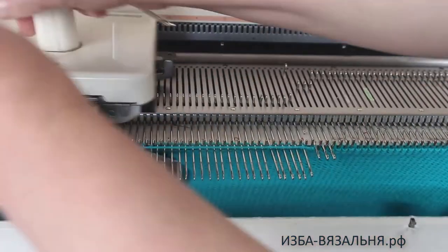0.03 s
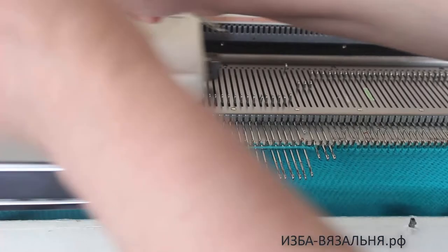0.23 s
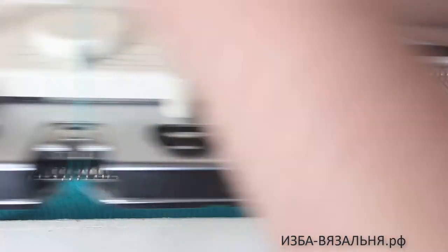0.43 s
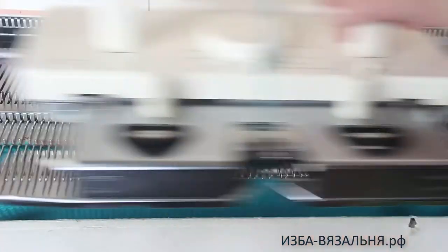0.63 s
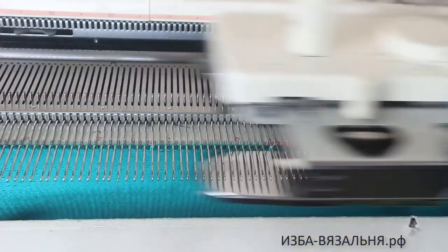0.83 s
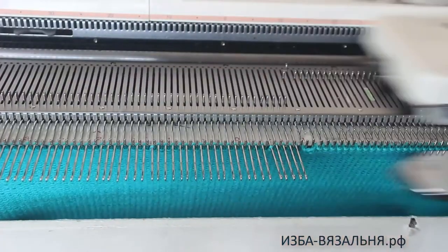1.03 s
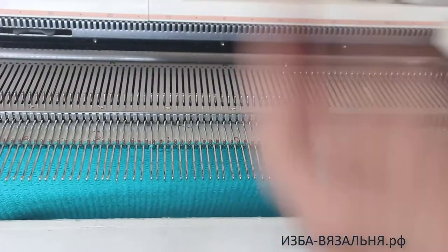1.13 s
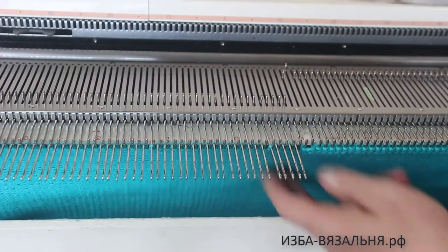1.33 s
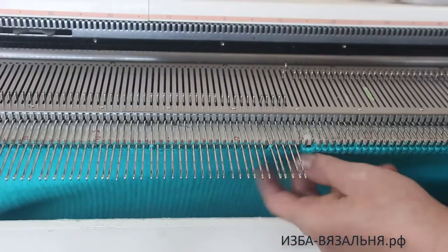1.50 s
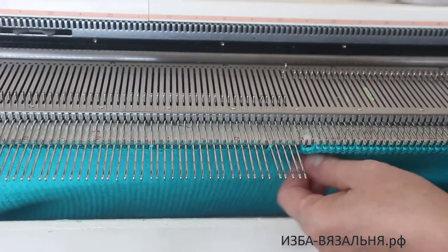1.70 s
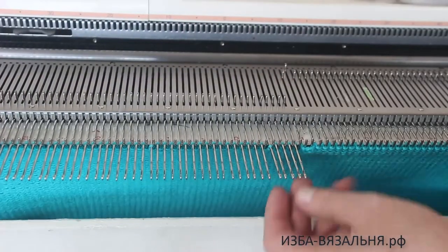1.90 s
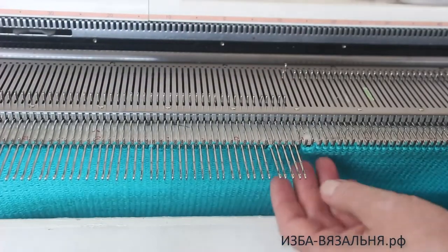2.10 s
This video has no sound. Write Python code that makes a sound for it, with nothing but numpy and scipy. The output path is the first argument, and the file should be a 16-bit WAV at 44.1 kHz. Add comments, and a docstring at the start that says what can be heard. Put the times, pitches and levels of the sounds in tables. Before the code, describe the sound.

A knitting machine carriage slides once along its steel needle bed. Light ticks at 0 to 0.2 s thicken into a bright ratcheting hiss over a low drone, with sharp clacks near 0.45, 0.75 and 1.05 s, loudest around 0.7 s. By 1.2 s it coasts away with a brief resonant rub. Faint hand rustling and soft thuds come near 1.5 s, then quiet room. Close, short reverberation.

```python
"""A knitting machine carriage is pushed once along its steel needle bed in a small room.
Its cams strike needle after needle: single ticks thicken into a hiss of impulse bursts coloured by steel.
The needle rate drives drone, boom and singing overtones of the bed; decaying noise makes clicks and knocks.
Past the last needle it coasts on its rail, as resonant rubbing; then a hand brushes the knitting, as soft
swells of noise. A diffuse room tail and a quiet background surround it."""
import sys
import numpy as np
from scipy import signal
from scipy.fft import rfft, irfft, next_fast_len
from scipy.io import wavfile
from scipy.ndimage import uniform_filter1d

SR = 44100
rng = np.random.default_rng(int(sys.argv[2]) if len(sys.argv) > 2 else 0)


def wrap_up_sound(samples):
    """Save the sound to the file named by the first command line argument, as 16-bit audio."""
    columns = np.atleast_2d(samples).T
    # keep every value between -1 and 1, then stretch to whole-number steps
    tamed = np.clip(columns, -1, 1)
    steps = np.round(tamed * 32767).astype(np.int16)
    wavfile.write(sys.argv[1], SR, steps)


N = 94815

# needles passing the cams: time_s, needles_per_s
NEEDLE_RATE = [(0, 36), (.12, 42), (.22, 52), (.32, 80), (.45, 120), (.5, 123), (.58, 142), (.68, 156),
               (.75, 128), (.87, 127), (.93, 136), (1.06, 137), (1.15, 100)]
# spectrum of steel as the carriage leaves the needles, also of brushed yarn: frequency_hz, relative_db
LEAVING_COLOUR = [(410, -33.5), (700, 1.5), (895, -3.5), (1270, 1), (1390, -5), (1830, -9), (2000, 0.5),
                  (2660, 1.5), (3490, -2.5), (3920, -0.5), (8430, -3.5), (12800, -13), (15500, -20.5)]


def amp(db):
    """Amplitude ratio: 20 dB are a factor of ten."""
    return 10 ** (np.asarray(db) / 20)


def unit(x):
    """Normalisation to an rms amplitude of 1."""
    return x / np.sqrt(np.mean(x ** 2) + 1e-20)


def curve(rows):
    """Linear interpolation of (time_s, value) points, one value per sample."""
    return np.interp(np.arange(N) / SR, *np.transpose(rows))


def level(rows):
    """Gain from (time_s, level_db) points, with exponential decay after the last one."""
    release_t60_s = 0.6
    past_s = np.maximum(np.arange(N) / SR - rows[-1][0], 0)
    return amp(curve(rows) - 60 * past_s / release_t60_s)


def noise():
    """White noise: equal mean power at every frequency."""
    return rng.standard_normal(N)


def filtered(x, response):
    """Linear filtering: the spectrum is multiplied by a frequency response."""
    m = next_fast_len(N + SR // 2)
    return irfft(rfft(x, m) * response(np.fft.rfftfreq(m, 1 / SR)), m)[:N]


def coloured(x, points, size=8192):
    """Minimum-phase filtering to (frequency_hz, relative_db) points, at rms 1."""
    hz, db = np.transpose(points)
    grid_hz = np.fft.rfftfreq(size, 1 / SR)
    gain_db = np.interp(np.log(grid_hz + 1), np.log(hz + 1), db)
    # folding the cepstrum onto positive times makes the filter causal
    cepstrum = irfft(np.log(amp(gain_db)))
    cepstrum[1:size // 2] *= 2
    cepstrum[size // 2 + 1:] = 0
    impulse_response = irfft(np.exp(rfft(cepstrum)))
    return unit(signal.fftconvolve(x, impulse_response)[:N])


def resonant(x, modes):
    """Modal superposition of (frequency_hz, width_hz, relative_db) resonances, at rms 1."""
    def response(f):
        total = 0
        for k, (hz, width, db) in enumerate(modes):
            sign = (-1) ** k  # neighbouring modes in opposite phase
            damping = 1j * f * width
            total = total + sign * amp(db) * damping / (hz * hz - f * f + damping)
        return total
    return unit(filtered(x, response))


def pulses(times, spread_db):
    """Idealised impacts: single-sample impulses of uneven size."""
    size = amp(spread_db * np.clip(rng.standard_normal(len(times)), -2, 2))
    return np.bincount(np.clip(times * SR, 0, N).astype(int), size, N + 1)[:N]


def burst(impulses, ring_s):
    """Scattering in steel: impulse energy decays exponentially and shapes dense noise, at rms 1."""
    energy = signal.lfilter([1], [1, -np.exp(-2 / (ring_s * SR))], impulses ** 2)
    return unit(np.sqrt(np.abs(energy)) * noise())


def passes(offset):
    """Kinematics: integrated needle rate gives the times of passing, offset in needle spacings."""
    travel = np.cumsum(curve(NEEDLE_RATE)) / SR
    return np.interp(np.arange(int(travel[-1]) - 1) + offset, travel, np.arange(N) / SR)


def decays(rows, attack_s):
    """Exponential decay of struck bodies with a short onset, from (start_s, level_db, t60_s)."""
    envelope = np.zeros(N)
    for start_s, db, t60_s in rows:
        age = np.maximum(np.arange(N) / SR - start_s, 0)
        envelope += amp(db - 60 * age / t60_s) * (1 - np.exp(-age / attack_s))
    return envelope


def swell(peak_s, db, rise_s, fall_s):
    """Exponential growth and decay of friction noise about a peak."""
    depth_db = 19  # below the peak, rise_s before it and fall_s after it
    t = np.arange(N) / SR - peak_s
    return amp(db - depth_db * np.maximum(-t / rise_s, t / fall_s))


def background():
    """Stationary random noise with a falling spectrum stands for the quiet background."""
    # background spectrum: frequency_hz, relative_db
    floor_colour = [(25, -10), (70, -5.5), (170, -0.5), (280, -4.5), (450, -6), (600, -13.5), (1000, -15),
                    (2400, -18.5), (7000, -24.5), (12000, -31), (15500, -37)]
    return amp(-63) * coloured(noise(), floor_colour)


def room(x):
    """Diffuse reverberation: convolution with exponentially decaying noise of unit energy."""
    t60_s, onset_s = 0.32, 0.0013
    t = np.arange(SR // 2) / SR
    tail = rng.standard_normal(len(t)) * amp(-60 * t / t60_s) * (1 - np.exp(-t / onset_s))
    return signal.fftconvolve(x, tail / np.linalg.norm(tail))[:N]


def handling():
    """Friction and soft impact: rubbing, yarn brushing over the needles and light bumps on the bed."""
    # the carriage settling, then the hand: peak_s, level_db, rise_s, fall_s
    rub_swells = [(1.33, -55, 0.23, 0.14), (1.45, -68.5, 0.062, 0.16), (1.535, -53.5, 0.047, 0.037),
                  (1.627, -67.5, 0.026, 0.43)]
    # spectrum of the rubs: frequency_hz, relative_db
    rub_colour = [(60, -10), (140, 1), (250, 2), (450, 1), (800, -3.5), (1400, -7.5), (2600, -7.5),
                  (3600, -15), (6000, -19.5), (15000, -47)]
    # faint bright brushes: peak_s, level_db, rise_s, fall_s
    brush_swells = [(1.29, -60, 0.064, 0.063), (1.46, -67.5, .06, .12), (1.533, -64, .03, 0.045)]
    # the hand bumping the bed: start_s, level_db, t60_s
    bump_blows = [(1.527, -51, 0.14), (1.545, -44, 0.086), (1.6, -52, 0.113), (1.632, -61, 0.062)]
    # spectrum of the bumps: frequency_hz, relative_db
    thud_colour = [(30, -25), (80, -4), (140, 13), (220, -1), (400, -8), (600, -0.5), (1000, -22),
                   (3000, -43)]
    rubs = sum(swell(*row) for row in rub_swells) * coloured(noise(), rub_colour)
    brushes = sum(swell(*row) for row in brush_swells) * coloured(noise(), LEAVING_COLOUR)
    bumps = decays(bump_blows, attack_s=0.0038) * coloured(noise(), thud_colour)
    return rubs + brushes + bumps


def slips():
    """Irregular friction: white noise whose strength varies at random from sample to sample."""
    return noise() * amp(2.5 * noise())


def rail():
    """Friction-driven resonance: the coasting carriage rubs the rail's low modes and steel resonances."""
    # low modes of the rail: frequency_hz, width_hz, relative_db
    rail_modes = [(370, 140, 3.5), (450, 59, 9.5), (560, 41, 6.5), (616, 61, 7.5), (743, 44, 2),
                  (850, 180, -5.5), (1290, 210, -7), (2200, 450, -8)]
    # coasting on the rail: time_s, level_db
    coast_level = [(0.95, -65), (1.07, -54), (1.13, -48), (1.175, -40), (1.205, -42.5), (1.24, -49.5),
                   (1.29, -54), (1.33, -93), (1.42, -65.5)]
    # steel resonances of the rail: frequency_hz, width_hz, peak_s, level_db
    steel_rings = [(2500, 1500, 1.311, -56.5), (3650, 1300, 1.146, -47), (4200, 450, 1.176, -47.5),
                   (4820, 160, 1.166, -52.5), (6100, 420, 1.156, -53), (7070, 180, 1.114, -53),
                   (8450, 400, 0.82, -71)]
    lowpass = signal.butter(2, 4000, fs=SR, output="sos")
    low = signal.sosfilt(lowpass, resonant(slips(), rail_modes))
    ring = np.zeros(N)
    for hz, width, peak_s, db in steel_rings:
        mode = [(hz, width, 0)]
        narrow = resonant(resonant(slips(), mode), mode)  # twice, for steeper skirts
        ring += swell(peak_s, db, rise_s=0.1, fall_s=0.1) * narrow
    return level(coast_level) * unit(low) + ring


def blows():
    """Impact and decay: bright steel clicks and duller knocks of the carriage, each a short clatter."""
    # steel clicks of the carriage: start_s, level_db, t60_s
    click_blows = [(.453, -34, 0.086), (.468, -24, 0.081), (.777, -25, 0.039), (1.0435, -23.5, 0.037),
                   (1.121, -33, 0.058)]
    # spectrum of the clicks: frequency_hz, relative_db
    click_colour = [(100, -22), (500, -2.5), (1500, 1.5), (4000, 3.5), (6300, 0), (7400, 2.5), (8800, -7),
                    (12000, -6.5), (15500, -25)]
    # knocks of the carriage against the bed: start_s, level_db, t60_s
    knock_blows = [(.047, -52, 0.07), (.413, -27, 0.057), (.423, -25, 0.069), (.429, -25, 0.037),
                   (.474, -26, 0.089), (.722, -28.5, 0.1), (.733, -53.5, 0.047), (.744, -30, 0.067),
                   (.763, -24.5, 0.046), (1.049, -34.5, 0.12)]
    # spectrum of the knocks: frequency_hz, relative_db
    knock_colour = [(30, -19.5), (80, -9.5), (130, -0.5), (220, -5.5), (420, 5), (750, 2), (1100, 0.5),
                    (2200, -5), (4000, -23), (12000, -39)]
    clicks = decays(click_blows, attack_s=0.001) * coloured(noise(), click_colour)
    knocks = decays(knock_blows, attack_s=0.0021) * coloured(noise(), knock_colour)
    return clicks + knocks


def singing():
    """Harmonics of the needle rate stand out briefly; the carriage shell hums on one steady mode."""
    # overtones sung by the bed: centre_s, level_db, length_s, multiple_of_needle_rate
    sung_overtones = [(0.48, -40.5, 0.046, 3), (0.669, -36.5, 0.024, 3), (0.66, -47.5, 0.083, 2),
                      (0.735, -37, 0.082, 5), (0.805, -36.5, .15, 3), (0.868, -49, 0.21, 2)]
    # hum of the shell as the carriage sets off: time_s, level_db
    hum_level = [(0, -78), (.15, -58), (.3, -51), (.4, -68.5), (.5, -91.5)]
    hum_hz = 389.8
    t = np.arange(N) / SR
    needle_phase = 2 * np.pi * np.cumsum(curve(NEEDLE_RATE)) / SR
    tones = level(hum_level) * np.sin(2 * np.pi * hum_hz * t)
    for centre_s, db, length_s, multiple in sung_overtones:
        window = 1 / (1 + (2 * (t - centre_s) / length_s) ** 4)  # half amplitude at both ends
        tones += amp(db) * window * np.sin(multiple * needle_phase)
    return np.sqrt(2) * tones  # levels are rms, not peak


def bed():
    """Forced vibration: the needles' even beat and the carriage's grinding shake the bed's modes."""
    # shaking of the bed: time_s, level_db
    shake_level = [(0, -58), (.1, -49), (.24, -47.5), (.38, -40), (.46, -37), (.56, -36), (.69, -37),
                   (.75, -36.5), (.82, -38.5), (.95, -40.5), (1.05, -38), (1.11, -49), (1.25, -54.5),
                   (1.42, -71.5)]
    # modes of the bed above the lowest: frequency_hz, width_hz, relative_db
    bed_modes = [(254.4, 8.3, -5), (312, 9.1, -4.5), (371, 14, 0), (469, 78, -2.5), (606, 73, 1),
                 (636, 38, -5.5), (648, 57, -6.5), (798, 94, -4), (1004, 108, -4.5)]
    # spectrum of the grinding: frequency_hz, relative_db
    grind_colour = [(30, -40), (70, -3.5), (110, -9.5), (200, -2), (400, 4.5), (700, -7.5), (1100, -5),
                    (1800, 5), (4000, -51)]
    # low boom of the bed: time_s, level_db
    boom_level = [(0, -70), (.26, -62.5), (.32, -50), (.365, -63), (.42, -43.5), (.53, -57), (.66, -47),
                  (.72, -52), (.765, -36.5), (.83, -44), (.885, -50), (.93, -40), (1.01, -48.5),
                  (1.06, -40.5), (1.145, -65), (1.2, -50), (1.27, -66)]
    # lowest mode of the bed: frequency_hz, width_hz, relative_db
    boom_mode = [(140.8, 15, 0)]
    drone_db, grind_db, beat_db = -3, -6, -5
    boom_tone_db, boom_noise_db = 3, 1.5
    rate = curve(NEEDLE_RATE)
    beat = unit(pulses(passes(0.501), spread_db=5.5))
    drone = resonant(amp(beat_db) * beat + noise(), bed_modes)
    body = amp(drone_db) * drone + amp(grind_db) * coloured(noise(), grind_colour)
    # the tone follows the needle rate and grows as that nears the lowest mode
    hz, width, _ = boom_mode[0]
    resonance_gain = 1 / np.hypot(1, (rate - hz) / width)
    tone = np.sin(2 * np.pi * np.cumsum(rate) / SR) * resonance_gain
    rumble = resonant(resonant(noise(), boom_mode), boom_mode)
    # dividing by the running rms evens out the rumble
    rumble /= np.sqrt(np.abs(uniform_filter1d(rumble ** 2, size=1600)) + 1e-6)
    boom = amp(boom_tone_db) * tone + amp(boom_noise_db) * rumble
    return level(shake_level) * body + level(boom_level) * boom


def needle_contacts(cam_count=2):
    """Repeated impact and friction: cams strike needle butts, latches flick and steel scrapes."""
    cam_db, latch_db, scrape_db = -4, -5.5, -2.5
    cam_scatter_s, cam_ring_s, latch_ring_s = 0.0012, 0.0035, 0.0008
    latches_per_needle, latch_spread_db = 9.2, 2.5
    cams = np.zeros(N)
    for offset in rng.random(cam_count):
        times = passes(offset)
        times = times + cam_scatter_s * rng.standard_normal(len(times))
        cams += pulses(times, spread_db=1.5)
    # latches flick at random, on average in proportion to the needle rate
    flicked = rng.random(N) < latches_per_needle * curve(NEEDLE_RATE) / SR
    latches = flicked * amp(latch_spread_db * np.clip(noise(), -2, 2))
    impacts = amp(cam_db) * burst(cams, cam_ring_s) + amp(latch_db) * burst(latches, latch_ring_s)
    return impacts + amp(scrape_db) * noise()


def needles():
    """Impact radiation: contacts excite steel, whose colour shifts with the carriage's place."""
    # rattle of the needles: time_s, level_db
    rattle_level = [(0, -55), (.04, -50.5), (.07, -44), (.22, -39), (.27, -34.5), (.35, -33), (.45, -28.5),
                    (.53, -28), (.64, -27.5), (.715, -25.5), (.8, -29.5), (.92, -29.5), (.98, -32.5),
                    (1.04, -38.5), (1.085, -47.5), (1.15, -50), (1.24, -66), (1.4, -81)]
    # spectrum as the carriage enters the needles: frequency_hz, relative_db
    entering_colour = [(410, -62), (700, -8), (797, -3), (919, -10), (1320, -2), (1600, -11.5), (1780, 0),
                       (2220, -7), (2690, 0), (3230, -6.5), (3580, -2), (4640, 0.5), (5640, -1.5),
                       (6100, 2), (7400, -8.5), (8650, 0), (10600, -9), (13100, -10.5), (15500, -25)]
    # spectrum as it crosses them: frequency_hz, relative_db
    crossing_colour = [(410, -35.5), (700, -14.5), (1320, 4.5), (1430, -4), (1760, 4), (2460, -3.5),
                       (2870, 4), (3730, 1.5), (6500, 3.5), (7500, -3.5), (8540, 0), (13300, -6.5),
                       (15500, -16.5)]
    # moments when the entering, crossing and leaving colours are pure: time_s
    pure_times = [0.36, 0.43, 0.85]
    # ring of needles and cams: frequency_hz, width_hz, relative_db
    steel_modes = [(1810, 20, 3.5), (2810, 99, 1.5), (4780, 110, -4), (5400, 360, -13.5), (6760, 770, -2),
                   (8510, 210, 16), (8900, 146, 6), (12000, 67, -4.5), (13140, 290, 0)]
    # spectrum of the fine ticks: frequency_hz, relative_db
    flick_colour = [(1000, -32), (4500, -2.5), (7400, 0), (8500, -8), (13000, -7), (15500, -15)]
    # first slow needles, heard one by one: start_s, level_db
    first_ticks = [(.006, -44.5), (0.019, -44), (0.045, -36.5), (.066, -42), (.083, -48), (.1035, -35),
                   (.128, -35.5), (.149, -39.5), (0.173, -35.5), (0.193, -38), (0.214, -42)]
    steel_db, flick_db, flick_ring_s, tick_t60_s = -16, -8, 0.001, 0.055
    contacts = needle_contacts()
    # each colour fades in and out linearly between its neighbours
    shares = [curve(list(zip(pure_times, row))) for row in np.eye(len(pure_times))]
    colours = (entering_colour, crossing_colour, LEAVING_COLOUR)
    rattle = sum(share * coloured(contacts, colour) for share, colour in zip(shares, colours))
    ring = resonant(np.abs(contacts) * noise(), steel_modes)
    # one fine bright tick per needle, heard with the entering colour
    fine_ticks = burst(pulses(passes(0.5), spread_db=0), flick_ring_s)
    flicks = shares[0] * coloured(fine_ticks, flick_colour)
    tick_envelope = decays([(start_s, db, tick_t60_s) for start_s, db in first_ticks], attack_s=0.0013)
    ticks = tick_envelope * coloured(noise(), entering_colour)
    return level(rattle_level) * (rattle + amp(steel_db) * ring + amp(flick_db) * flicks) + ticks


def scene():
    """Superposition of the machine's direct sound, its reverberation and the background."""
    machine = needles() + bed() + singing() + blows() + rail() + handling()
    room_db = -8
    return (machine + amp(room_db) * room(machine) + background())[None]


def record(dry):
    """Band limitation: nothing is kept above the upper limit."""
    top_hz = 15700
    return np.array([filtered(channel, lambda hz: hz < top_hz) for channel in dry])


dry = scene()
out = record(dry)
wrap_up_sound(out)
```